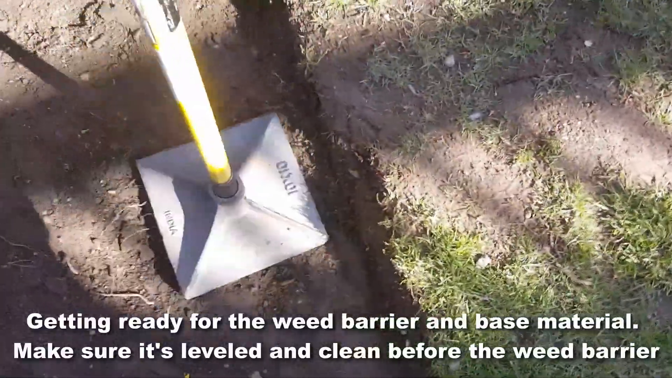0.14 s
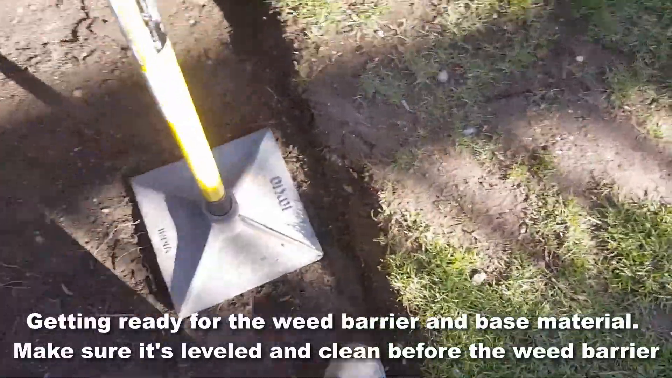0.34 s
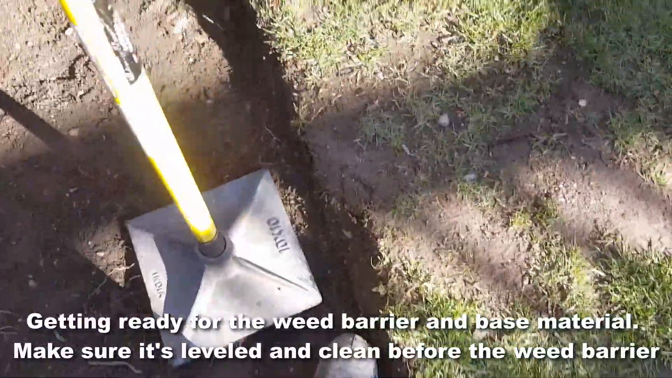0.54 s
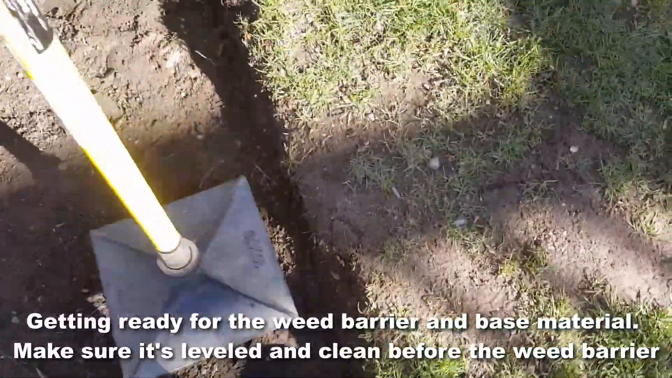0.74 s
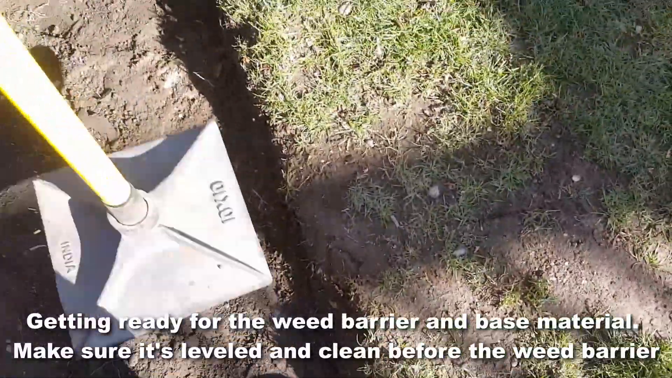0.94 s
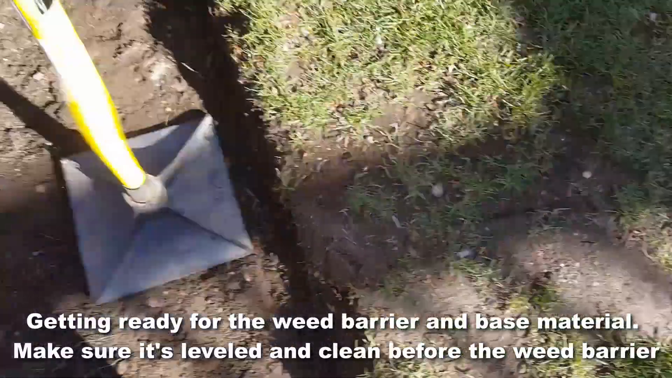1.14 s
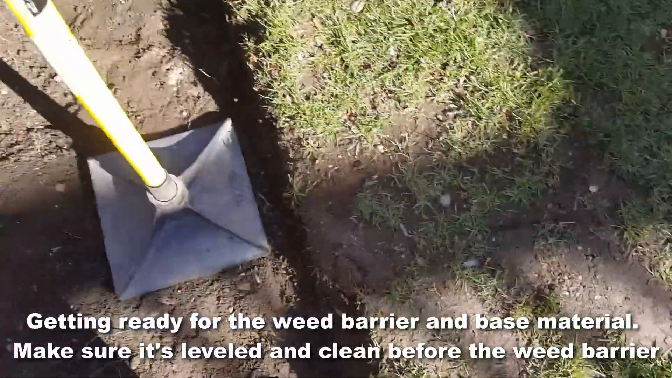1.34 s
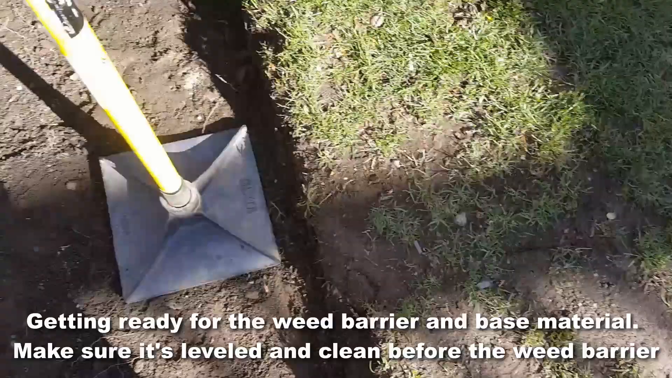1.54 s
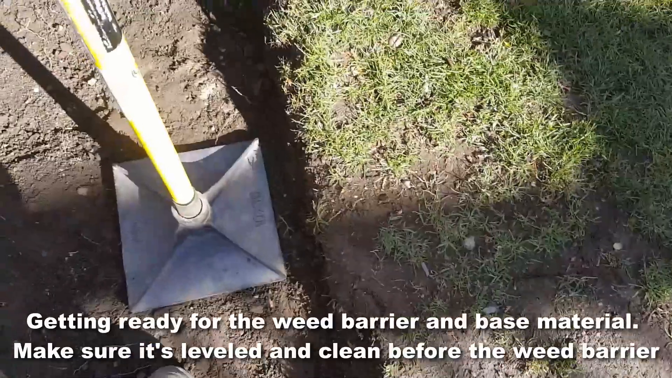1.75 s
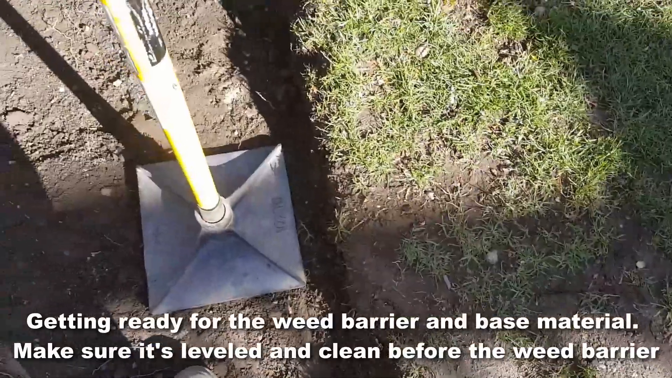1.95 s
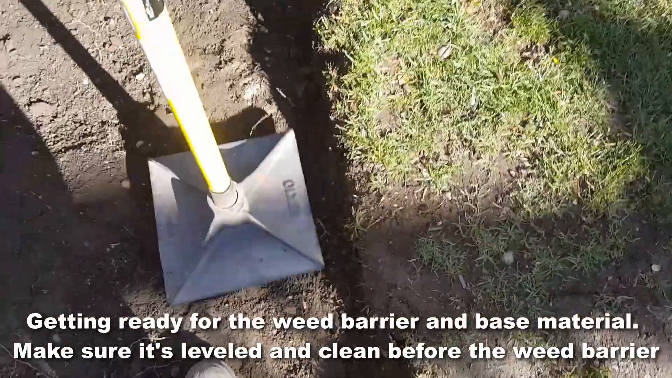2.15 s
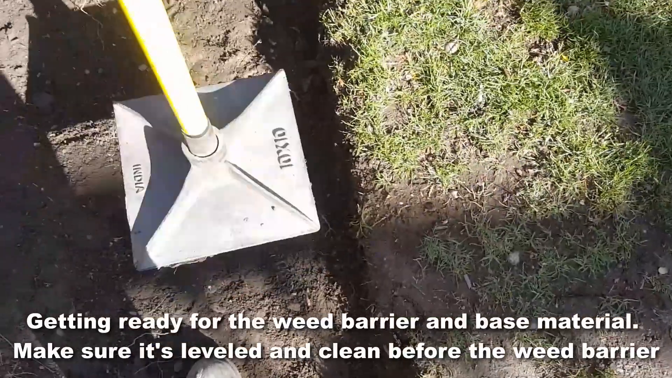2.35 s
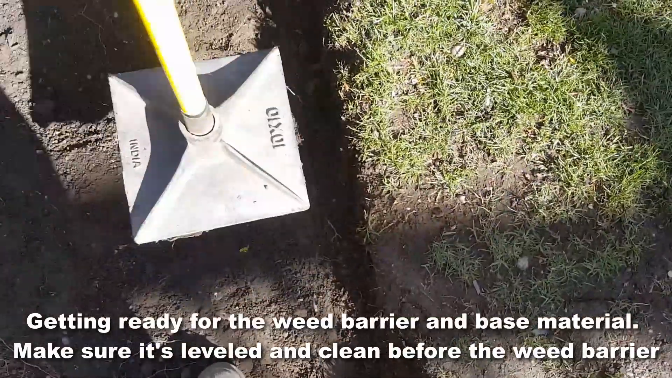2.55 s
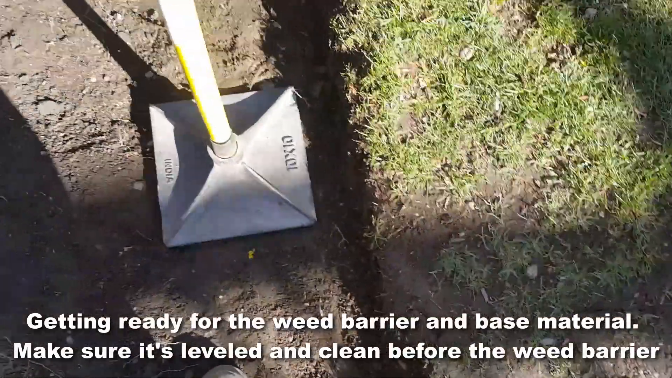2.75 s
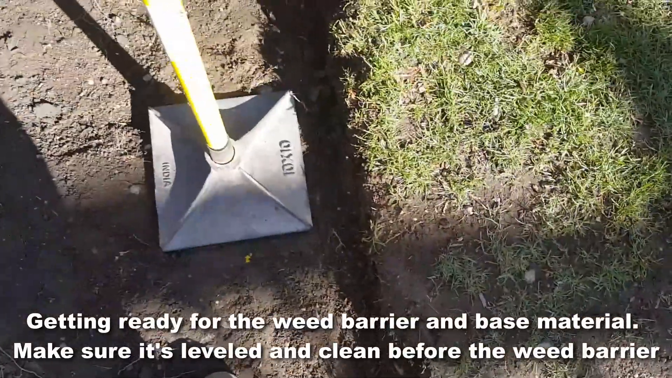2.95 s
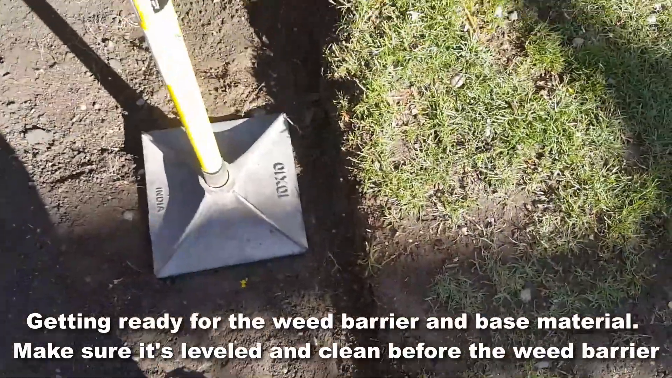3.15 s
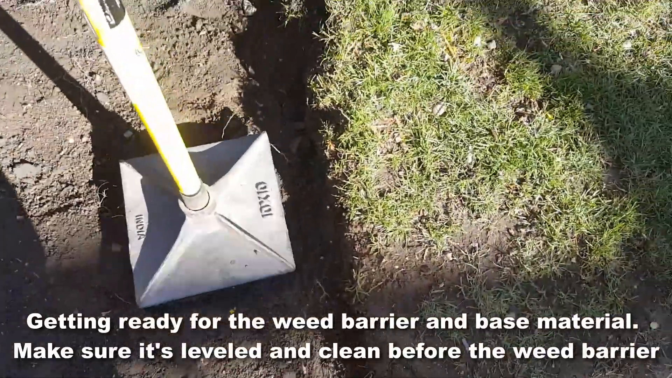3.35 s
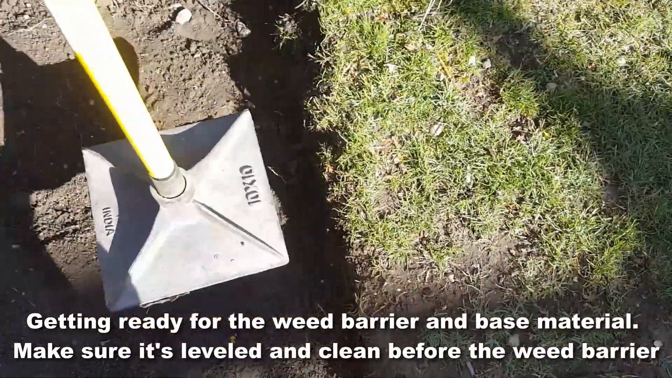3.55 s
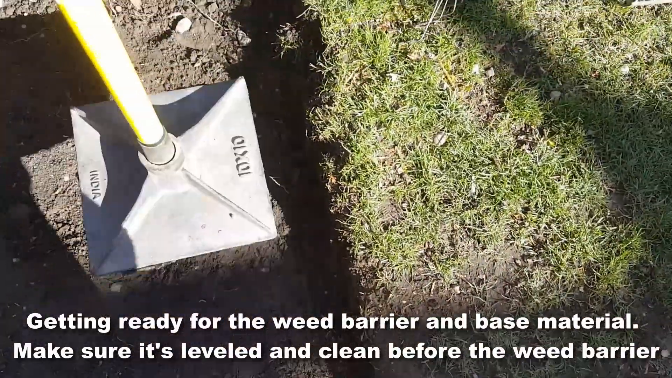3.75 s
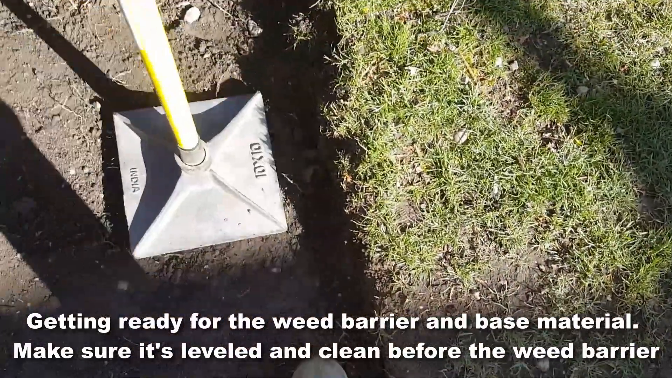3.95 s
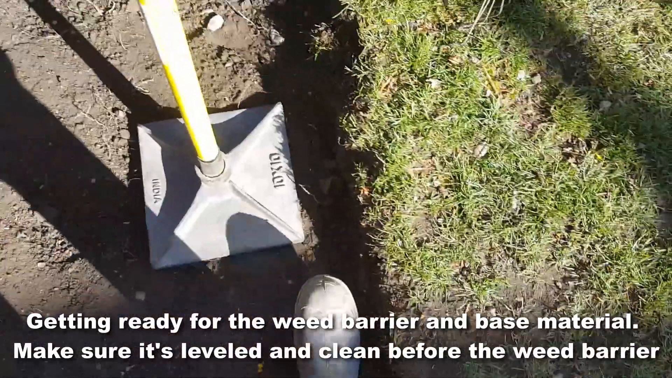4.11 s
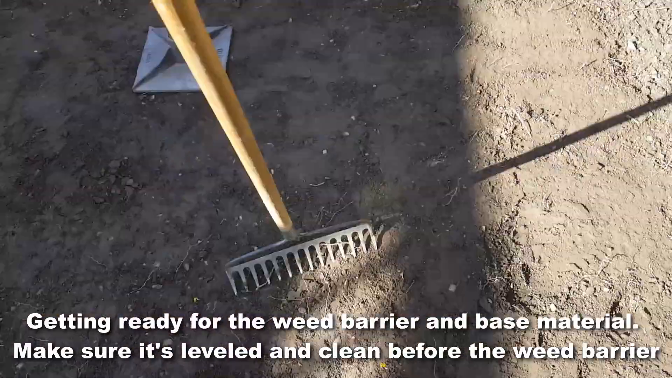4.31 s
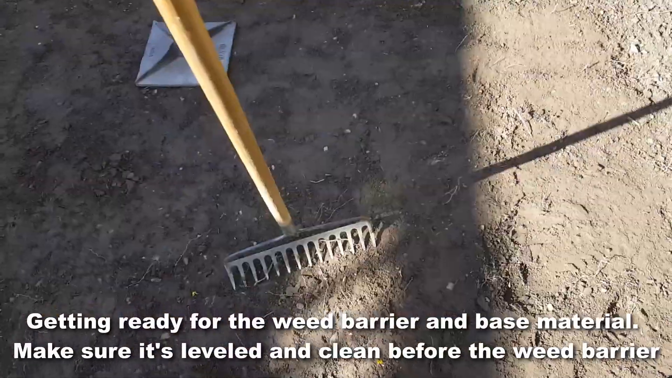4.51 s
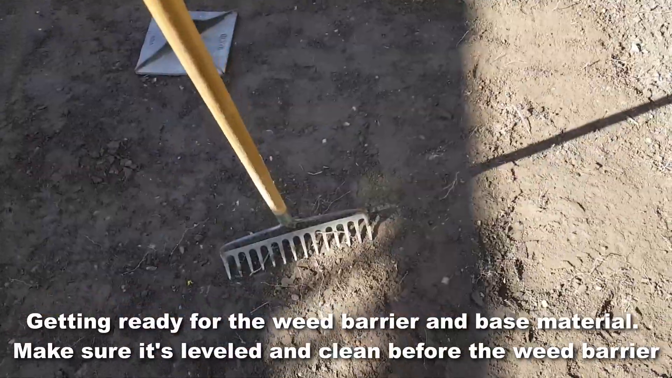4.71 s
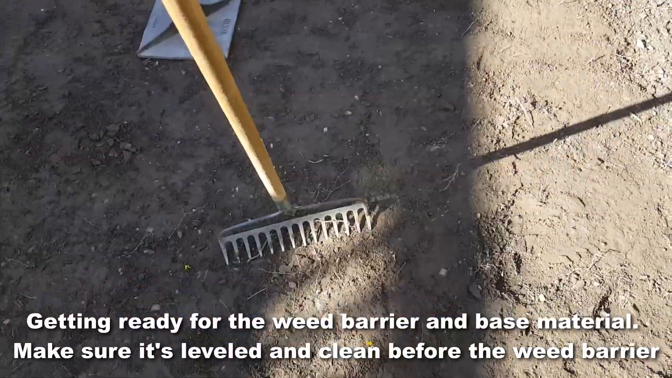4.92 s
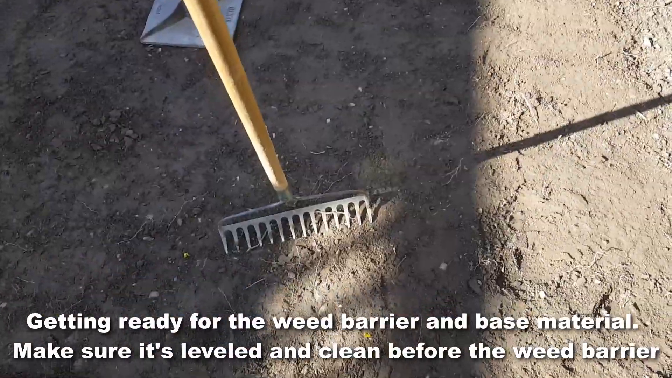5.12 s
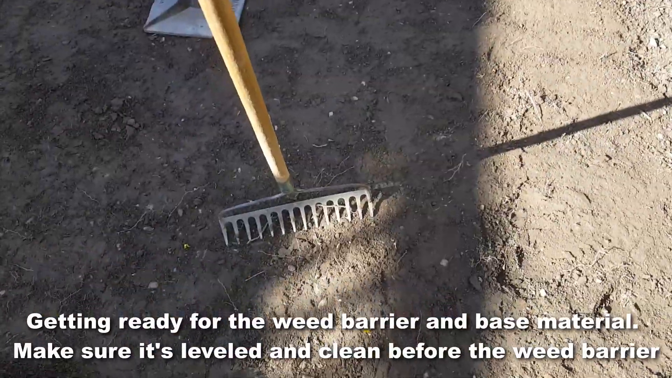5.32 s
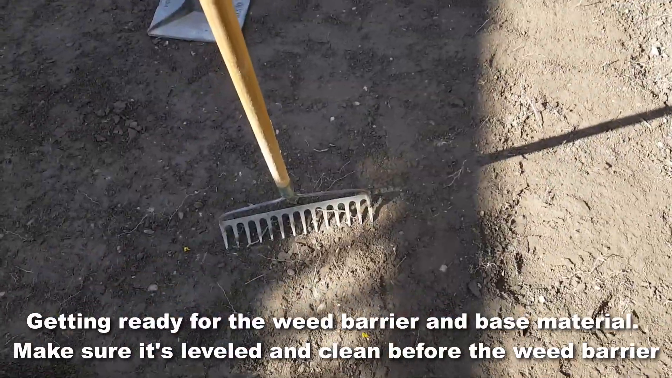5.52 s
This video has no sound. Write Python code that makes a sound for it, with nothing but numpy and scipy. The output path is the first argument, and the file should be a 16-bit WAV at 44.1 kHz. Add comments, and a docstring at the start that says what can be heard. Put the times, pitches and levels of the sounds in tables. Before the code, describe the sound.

Four weighty thumps of a metal plate on dirt, with gritty crunch, clanking handle rattle and soft soil scuffs in a quiet yard.

```python
"""In a quiet back yard with a low rumble and faint air, a steel hand tamper pounds bare soil four times, up close.
Each blow slaps and thuds (falling tones and dull noise), crushes grit (grainy noise) and rebounds once.
The plate then chatters on its ringing handle, slower and softer: cracks, sliding pings, clanks of steel.
Between blows the lifted tool rattles and loose soil scuffs; midway, far birds call in plain tones.
A last soft bump lands on the earth. A faint echo follows the work throughout."""
import sys
import numpy as np
from scipy import signal
from scipy.fft import rfft, irfft, next_fast_len
from scipy.io import wavfile
from scipy.ndimage import uniform_filter1d, map_coordinates

SR = 44100
rng = np.random.default_rng(int(sys.argv[2]) if len(sys.argv) > 2 else 0)


def master_out(mix):
    """Clip the mix to full scale and print it as 16-bit PCM to the path in sys.argv[1]."""
    frames = np.transpose(np.atleast_2d(mix))
    ceiling = np.clip(frames, -1, 1)
    pcm = np.round(ceiling * 32767).astype(np.int16)
    wavfile.write(sys.argv[1], SR, pcm)


N = 245794

# Levels in these tables are starting points: some sounds add a fixed gain to their table level.

# background level over time, with low blow tails and recorder gain dips after blows:
# (time [s], rumble level [dB], air level [dB])
BACKGROUND_LEVELS = [(0.0, -61.5, -63), (0.28, -42, -66.5), (0.53, -58, -63.5), (0.94, -56.5, -65.5),
                     (1.27, -59, -63), (1.38, -59, -63.5), (1.61, -67, -73.5), (2.73, -52.5, -62.5),
                     (2.95, -63, -68.5), (3.4, -61.5, -68.5), (3.89, -58.5, -63.5), (4.95, -57.5, -63),
                     (5.57, -58, -62)]
# tone colour of the low rumble: (frequency [Hz], level [dB])
RUMBLE_COLOUR = [(12, -44.5), (20, -10), (27, -9), (49, 2.5), (92, 7), (199, 4), (282, -20.5), (350, -18.5),
                 (460, -38), (770, -120)]
# tone colour of the faint air: (frequency [Hz], level [dB])
AIR_COLOUR = [(150, -26.5), (250, -2), (510, -9), (557, -8.5), (723, -10.5), (1240, -15), (1380, -15.5),
              (4260, -24), (5730, -29), (7570, -28.5), (9170, -36.5), (15200, -35.5), (16000, -38.5)]
# how alike left and right noise are: (frequency [Hz], likeness [0 to 1])
LEFT_RIGHT_LIKENESS = [(100, .93), (500, 0.67), (1000, 0.004), (2000, 0), (10000, 0)]
# how long the echo lasts: (frequency [Hz], time to fall 60 dB [s])
ECHO_FADE = [(100, 0.87), (500, 0.16), (2000, 0.68), (4600, 0.52), (8000, 0.1), (14000, 0.16)]
# far bird calls: (time [s], length [s], pitch [Hz], level [dB])
BIRD_CALLS = [(2.22, 0.25, 527, -64.5), (2.225, 0.3, 7300, -86), (3.07, 0.3, 524, -68)]
# loose soil shifts: (time [s], crumb level [dB], crumb fade time [s], dull pat level [dB])
SCUFFS = [(0.519, -30.5, 0.059, -42), (1.815, -56, 0.095, -79), (3.233, -55, 0.16, -69.5),
          (3.482, -49.5, 0.049, -70.5), (3.919, -37.5, .06, -66), (4.584, -51, 0.077, -79),
          (4.689, -47, 0.07, -49.5), (4.88, -51, 0.031, -69), (5.286, -42.5, 0.14, -40)]
# tone colour of rustling loose crumbs: (frequency [Hz], level [dB])
LOOSE_COLOUR = [(200, -16.5), (1100, 8.5), (3000, 1.5), (5000, 1), (8000, -7.5), (10000, -20),
                (15000, -21.5)]
# tone colour of a dull pat on soil: (frequency [Hz], level [dB])
PAT_COLOUR = [(30, -23), (80, -8), (160, 0.5), (300, -6.5), (700, -15.5), (1500, -29), (5000, -53.5)]
# the plate clacks on its handle as the tool rocks or is lifted:
# (time [s], knock strength [dB], crack strength over the knock [dB])
CLACKS = [(0.1655, -30, -7), (0.2205, -32.5, -30), (0.3138, -42, -8.5), (1.1246, -54, -7),
          (1.2897, -27, -3), (1.3323, -42, 20), (1.3428, -26, -12), (1.4196, -45.5, -6.5),
          (1.4697, -48, -11), (1.5347, -39, -11), (1.5806, -49, -6), (2.6181, -42.5, -27),
          (2.6452, -39, -22), (2.8006, -21.5, -27), (2.8117, -33, -15), (2.8294, -33, -19),
          (2.8528, -38.5, -17), (2.8936, -41.5, -7), (2.9311, -37.5, -9), (2.9897, -41.5, -19),
          (3.0381, -51, 4.5), (4.039, -34, -25), (4.069, -30.5, -33), (4.1419, -41.5, -10),
          (4.1709, -42.5, -1)]
# vibrations of the steel plate: (pitch [Hz], level [dB], time to fall 60 dB, capped in plate_modes [s])
PLATE_MODES = [(429, -24.5, 0.11), (614, -37, 0.065), (1058, -17.5, .16), (1200, -25.5, 0.096),
               (1434, -17.5, 0.061), (1340, -23.5, 0.044), (1826, -22, 0.14), (2176, -19.5, 0.049),
               (2210, -23.5, 0.42), (2570, -24, 0.059), (2885, -18.5, 0.047), (2770, -20.5, 0.16),
               (3330, -23, 0.12), (3064, -23, 0.037), (3600, -21.5, 0.2)]
# tone colour of a knock's sharp crack: (frequency [Hz], level [dB])
CRACK_COLOUR = [(300, -28.5), (1000, -14), (3600, -19.5), (5000, -3), (6500, 0.5), (8100, 6), (9300, -17),
                (11000, -17), (15000, -16)]
# tone colour of a steel clonk: (frequency [Hz], level [dB])
CLONK_COLOUR = [(300, -14.5), (850, -13.5), (1150, -2), (1900, -9), (2400, 1.5), (3000, -2), (3700, -2.5),
                (5000, -8.5), (9000, -40.5)]
# the handle's crowded overtones: (multiple of its ring pitch [ratio], level [dB])
SHIMMER_COLOUR = [(.07, -25), (.2, -31), (.5, -20.5), (0.921, -16.5), (.99, 9), (1.04, 5.5), (1.148, -3.5),
                  (1.351, -14), (1.8, -17), (2.049, -34), (3.3, -38)]
# low bumps and short, higher knocks: (time [s], level [dB], pitch [Hz], time to fall 60 dB [s])
BUMPS_AND_KNOCKS = [(0.337, -40.5, 125, 0.53), (0.5227, -25, 716, 0.0093), (1.538, -28, 690, 0.016),
                    (1.85, -34, 74.5, 0.046), (2.515, -36.5, 107.2, .18), (5.2900, -12.5, 177.5, 0.03)]
# tone colour of crushed grit: (frequency [Hz], level [dB])
GRIT_COLOUR = [(60, -7.5), (250, 5), (600, 0), (900, -1), (1600, -2.5), (2500, -11.5), (4000, -26),
               (8000, -22), (10000, -33), (15000, -31)]
# tone colour of fizzing sand: (frequency [Hz], level [dB])
FIZZ_COLOUR = [(2000, -31), (5000, -6.5), (6800, 3), (8200, -3), (9300, -16), (12500, -10), (15500, -13)]
# the plate lands: (time [s], slap level [dB], slap pitch [Hz], crushed grit level [dB], sand fizz level [dB],
# clod level [dB], ground level [dB], thump level [dB], thump pitch [Hz], rebound thump level [dB],
# rebound delay [s], first chatter level [dB], chatter fade [dB per s], chatter length [s],
# chatter's average crack strength over the knock [dB], handle's base ring pitch [Hz])
BLOWS = [(0.1056, -4, 540, -23, -41, -7.5, -13.5, -1.5, 127.4, -22, 0.095, -21, 100, .085, -8.5, 4540),
         (1.216, -7.5, 681.6, -20.5, -26.5, -23.5, -15.5, -14.5, 138, -23.5, 0.084, -17.5, 149, .19, -0.5, 4440),
         (2.6902, -10.5, 407.5, -19, -37.5, -18, -20, -26, 150.9, -24.5, .1004, -13.5, 261, .065, -5, 4320),
         (3.9524, -10, 435, -22.5, -33.5, -19.5, -22, -16, 167.3, -20, .076, -15, 226.5, .085, -1.5, 4466)]

LIFE = np.arange(SR // 2) / SR  # half a second of time for one short sound [s]


def amp(db):
    """Turn decibels into gain."""
    return 10 ** (np.asarray(db) / 20)


def unit(x):
    """Scale to an average (rms) strength of 1."""
    return x / np.sqrt(np.mean(x ** 2) + 1e-20)


def burst(x):
    """Scale a short sound to rms 1 over its first 4 ms."""
    return x / np.sqrt(np.mean(x[:, :round(.004 * SR)] ** 2))


def along(points, hz):
    """Read a table of (frequency, value) points on a log axis."""
    f, v = np.transpose(points)
    return np.interp(np.log(hz + 1), np.log(f + 1), v)


def fade(t60, rise):
    """Envelope that swells in about rise seconds and falls 60 dB in t60 seconds."""
    fall = np.exp(-np.log(1000) * LIFE / t60)
    return fall * (1 - np.exp(-LIFE / rise))


def sides(pan_db):
    """Left and right gains for a level difference, left minus right."""
    return amp(np.array([[pan_db], [-pan_db]]) / 2)


def add(track, s, sound):
    """Mix a sound into the track at time s."""
    part = track[:, max(round(s * SR), 0):][:, :len(LIFE)]
    part += sound[..., :part.shape[1]]


def noise(spectrum, size=len(LIFE)):
    """Coloured stereo noise of rms 1, alike in the bass and unrelated in the treble."""
    hz = np.fft.rfftfreq(size, 1 / SR)
    # more side against mid makes left and right less alike
    turn = np.arccos(np.clip(along(LEFT_RIGHT_LIKENESS, hz), -1, 1)) / 2
    shares = [np.cos(turn), np.sin(turn)]
    white = rfft(rng.standard_normal((2, size)))
    mid, side = irfft(white * amp(along(spectrum, hz)) * shares, size)
    return unit(np.array([mid + side, mid - side]))


def wobble(rate):
    """A smooth random curve with rate random points a second."""
    points = rng.standard_normal(int(N * rate / SR) + 4)
    return map_coordinates(points, [np.arange(N) * rate / SR])


def crumbly(x, depth_db):
    """Break a sound into millisecond grains of random size."""
    grains = unit(uniform_filter1d(rng.standard_normal(len(LIFE)), size=50))
    return unit(x * amp(depth_db * grains))


def swing(hz, t60, rise):
    """One vibration that dies away, like a plucked spring."""
    return np.sin(2 * np.pi * hz * LIFE) * fade(t60, rise)


def thump(hz, t60):
    """One dying vibration, as of packed soil under a weight, with a dull pat."""
    return swing(hz, t60, rise=0.0025) + amp(-11) * noise(PAT_COLOUR) * fade(t60, rise=0.0047)


def yard():
    """Low outdoor rumble and faint air: coloured noise whose level follows a table and wavers."""
    s, *levels = np.transpose(BACKGROUND_LEVELS)
    rumble_db, air_db = [np.interp(np.arange(N) / SR, s, level) for level in levels]
    size = next_fast_len(N)
    rumble_gain = amp(2.5 + rumble_db + 2.2 * wobble(rate=6))
    rumble = rumble_gain * noise(RUMBLE_COLOUR, size)[:, :N]
    air_gain = amp(3 + air_db + 0.39 * wobble(rate=4.0))
    air = air_gain * noise(AIR_COLOUR, size)[:, :N]
    return (rumble + air) * sides(pan_db=1.5)


def birds():
    """Far away, a dove coos twice and a small bird whistles thinly once: tones that swell and sink."""
    out = np.zeros((2, N))
    for s, length, hz, db in BIRD_CALLS:
        arch = np.sqrt(np.abs(np.sin(np.pi * np.minimum(LIFE / length, 1))))
        add(out, s, amp(db) * arch * np.sin(2 * np.pi * hz * LIFE))
    return out


def walls(x):
    """The fence and house give back a faint tail, each frequency dying at its own speed."""
    hz, t, z = signal.stft(rng.standard_normal((2, len(LIFE))), SR, nperseg=256)
    dying = np.exp(-np.log(1000) * t / along(ECHO_FADE, hz)[:, None])
    tail = signal.istft(z * dying, SR, nperseg=256)[1]
    return signal.fftconvolve(x, tail / np.linalg.norm(tail[0]), axes=1)[:, :N]


def scuffs():
    """Crumbs of soil rustle as grainy noise over a dull pat."""
    out = np.zeros((2, N))
    for s, db, length, pat_db in SCUFFS:
        crumbs = amp(db + 4.5) * crumbly(noise(LOOSE_COLOUR), depth_db=4.5) * fade(length, rise=length / 4)
        pat = amp(pat_db) * noise(PAT_COLOUR) * fade(t60=0.28, rise=0.0043)
        add(out, s, crumbs + pat)
    return out


def knocks():
    """List contacts of plate and handle as (s, dB, crack dB): single clacks, chatter, rebounds."""
    rows, k = list(CLACKS), np.arange(16)
    # the chatter slows: each gap is 2.3 ms longer than the last, before a little scatter
    gaps = .006 + .0023 * k
    for s, *_, rebound_s, first_db, fade_db_per_s, length, crack_db, _ in BLOWS:
        early, strength, hardness = rng.standard_normal((len(k), 3)).T
        after = .003 + np.cumsum(gaps) - gaps + .12 * gaps * early
        db = first_db - fade_db_per_s * after - 2 * strength
        chatter_rows = np.transpose([s + after, db, crack_db + 3 * hardness])
        rows += list(chatter_rows[after < length])
        rows.append((s + rebound_s, -27.5, -1.5))  # the lighter second landing
    return rows


def plate_modes():
    """The steel plate's separate vibrations, damped so that none outlasts a set time."""
    damped_t60_s = .13
    return np.array([amp(db) * np.exp(2j * np.pi * hz * LIFE) * fade(min(t60, damped_t60_s), rise=0.003)
                     for hz, db, t60 in PLATE_MODES])


def plate(ringing):
    """The steel's modes at new strengths; the soil under it detunes them a little each time."""
    phases = np.exp(2j * np.pi * rng.random((2, len(PLATE_MODES))))
    strength = amp(rng.normal(0, 4, len(PLATE_MODES))) * phases
    # a random waver roughens each pitch
    waver = unit(uniform_filter1d(rng.standard_normal(len(LIFE)), size=200))
    pace = 1 + rng.uniform(-.03, .03) + .025 * waver
    warped_s = np.cumsum(pace) / SR
    steady = (strength @ ringing).real
    return burst(np.array([np.interp(warped_s, LIFE, side, right=0) for side in steady]))


def ping(ring_hz, top_hz, glide, t60, rough_db):
    """A click runs through the handle: its high waves arrive first, then it slides down to the ring."""
    settled_hz = ring_hz * np.exp(rng.normal(0, 0.029))
    hz = settled_hz + top_hz * np.exp(rng.normal(0, 0.3) - LIFE / glide)
    phase = 2 * np.pi * (np.cumsum(hz) / SR + rng.random())
    # left and right carry the ping a quarter wave apart, which keeps it wide and even
    left_right = np.array([np.sin(phase), np.cos(phase)])
    # random grains roughen the ping
    return burst(crumbly(left_right, rough_db) * fade(t60, rise=0.00035))


def chatter():
    """Every knock of plate on handle cracks, pings and leaves both ringing."""
    out = np.zeros((2, N))
    ringing = plate_modes()
    for s, db, crack_db in knocks():
        # use the handle pitch of the blow nearest in time
        ring_hz = min(BLOWS, key=lambda blow: abs(blow[0] - s))[-1]
        # hard knocks wake the ring far more than light ones, which mostly clank
        shimmer = crumbly(noise(np.array(SHIMMER_COLOUR) * [ring_hz, 1]), depth_db=2.5)
        ring = amp(0.17 * db - 5.5) * shimmer * fade(t60=0.15, rise=0.0011)
        clonk = burst(crumbly(noise(CLONK_COLOUR), depth_db=3.0) * fade(t60=.024, rise=.0008))
        clank = amp(-3) * plate(ringing) + amp(10.5) * clonk
        crack = amp(crack_db - 5.5) * burst(noise(CRACK_COLOUR) * fade(t60=0.014, rise=0.00078))
        # the ping, too, grows faster than the knock
        slide = ping(ring_hz + 200, top_hz=1950, glide=.0007, t60=0.016, rough_db=4.5)
        slide = amp(0.091 * (db + 27) - 2.0) * slide
        wander = sides(rng.normal(0, 8.5))
        contact = wander * (crack * sides(pan_db=11.5) + slide * sides(pan_db=-1))
        # the clank follows only part of the knock's strength
        clank = amp(-20.5 + 0.84 * db) * clank * sides(pan_db=1.5)
        add(out, s + 0.00022, amp(db) * (contact + ring) + clank)
        # the loose joint strikes three more times, usually much more lightly, with the sides swapped
        for delay, jitter in zip(rng.uniform(0.0023, .024, size=3), rng.normal(0, 2.7, size=3)):
            add(out, s + delay, amp(db - 20.5 + jitter) * contact[::-1])
    return out


def soil():
    """The plate slaps the earth and crushes grit; the ground swings under its weight."""
    out = np.zeros((2, N))
    for (s, slap_db, slap_hz, grit_db, fizz_db, clod_db, ground_db, thump_db, thump_hz,
         rebound_db, rebound_s, *_) in BLOWS:
        # one edge brushes the loose crumbs just before the plate lands flat
        add(out, s - .003, amp(grit_db - 11.0) * noise(GRIT_COLOUR) * fade(t60=0.015, rise=0.00053))
        add(out, s, -amp(slap_db) * swing(slap_hz, t60=0.017, rise=0.00013))
        # grit is crushed, then trickles on more quietly; the steel gives its first clonk on the soil
        crushed = crumbly(noise(GRIT_COLOUR), depth_db=4.5) * fade(t60=0.063, rise=0.0015)
        add(out, s, amp(grit_db + 9.5) * crushed)
        clonk = burst(noise(CLONK_COLOUR) * fade(t60=.02, rise=.001))
        add(out, s + 0.0017, amp(grit_db + 4.5) * clonk)
        trickle = crumbly(noise(GRIT_COLOUR), depth_db=-2) * fade(t60=0.33, rise=0.03)
        add(out, s, amp(grit_db - 13.5) * trickle)
        fizz = crumbly(noise(FIZZ_COLOUR), depth_db=7.5) * fade(t60=0.18, rise=0.0011)
        add(out, s, amp(fizz_db) * fizz)
        # the packed clod under the plate answers at once, the wider ground late and low
        add(out, s + 0.0013, amp(clod_db - 2.0) * swing(hz=243.4, t60=0.11, rise=0.0047))
        add(out, s + .012, amp(ground_db) * swing(hz=63.3, t60=0.17, rise=0.011))
        # the weight sinks in, settles, and lands once more after its rebound
        add(out, s + 0.00074, amp(thump_db) * thump(thump_hz, t60=.105))
        add(out, s + .027, amp(ground_db + 6.5) * thump(hz=121, t60=0.043))
        add(out, s + rebound_s - .005, amp(rebound_db) * thump(.92 * thump_hz, t60=0.14))
    for s, db, hz, t60 in BUMPS_AND_KNOCKS:
        add(out, s, amp(db) * thump(hz, t60))
    # these sounds reach the right microphone port a little later
    port_lag_s = 0.00018
    t = np.arange(N) / SR
    late_right = np.interp(t - port_lag_s, t, out[1])
    return np.array([out[0], late_right]) * sides(pan_db=2.0)


def scene():
    """The tamper on the soil, its echo, the yard and the birds."""
    work = soil() + chatter() + scuffs()
    return work + amp(-26.0) * walls(work) + yard() + birds()


def record(dry):
    """The recorder rounds off the highest peaks and keeps nothing above its band limit."""
    top_hz, slope_hz = 16600, 900  # band limit and the width of the fade below it
    held = dry / (1 + dry ** 6) ** (1 / 6)
    size = next_fast_len(N + SR)  # spare silence keeps the end from wrapping to the start
    edge = np.clip((top_hz - np.fft.rfftfreq(size, 1 / SR)) / slope_hz, 0, 1)
    return irfft(rfft(held, size) * np.sin(np.pi * edge / 2) ** 2, size)[:, :N]


dry = scene()
out = record(dry)
master_out(out)
```